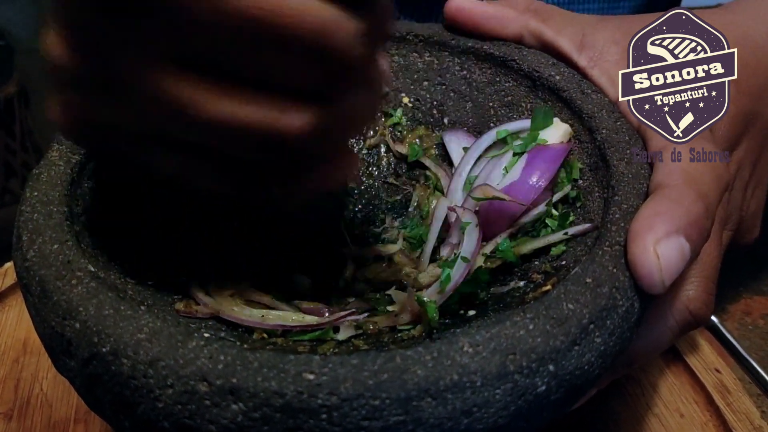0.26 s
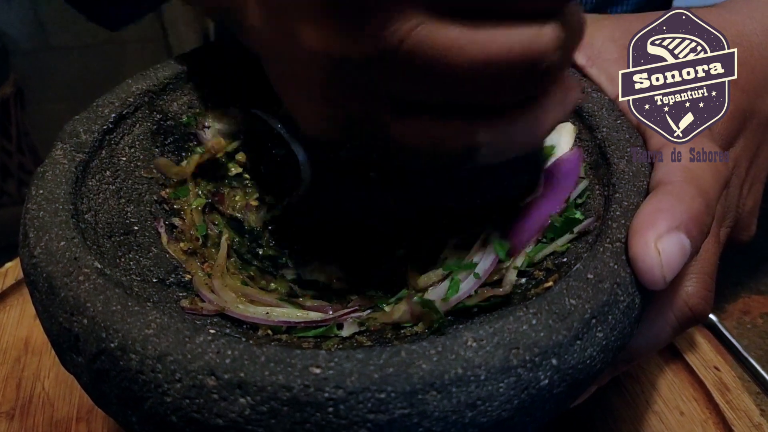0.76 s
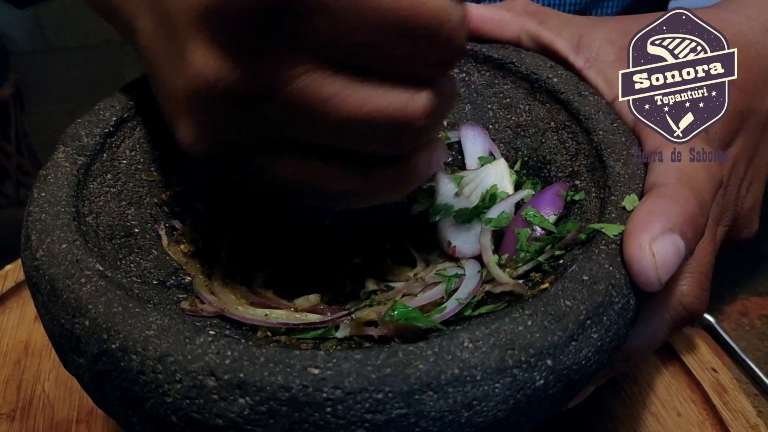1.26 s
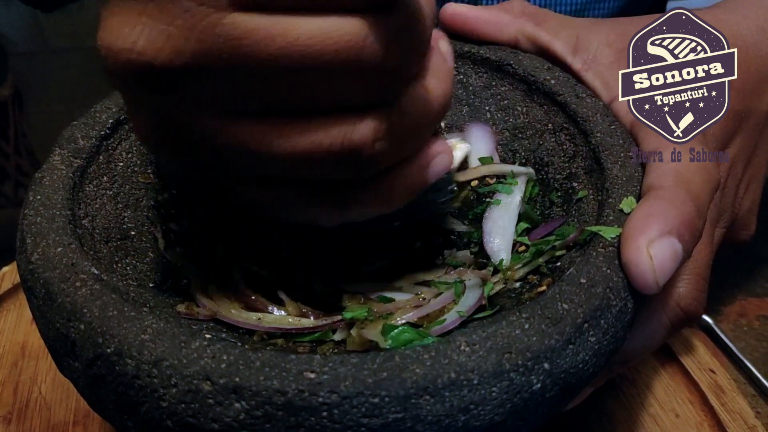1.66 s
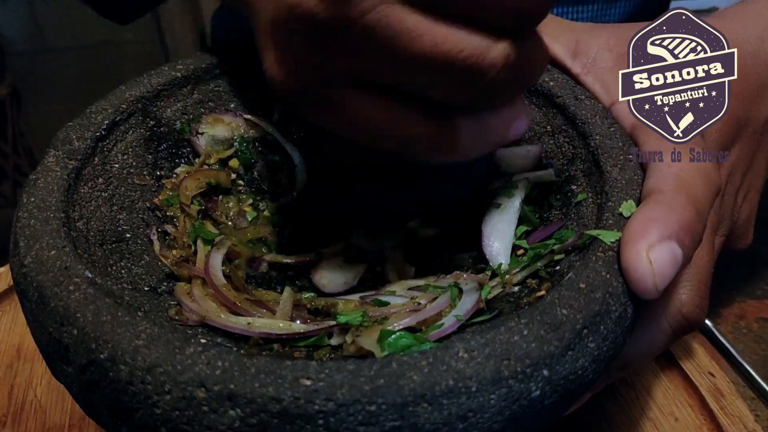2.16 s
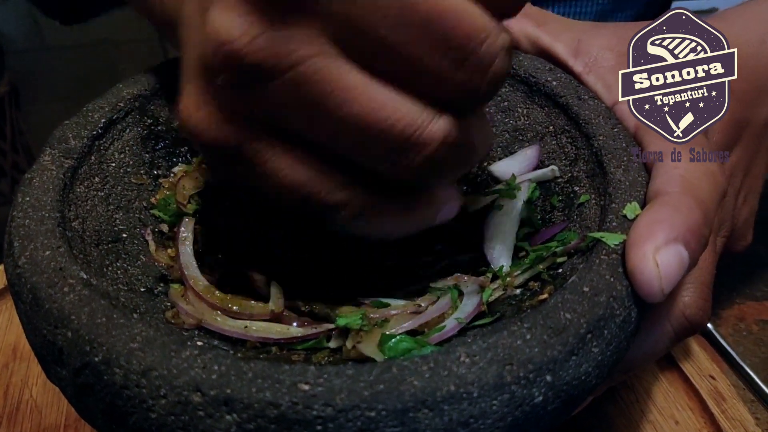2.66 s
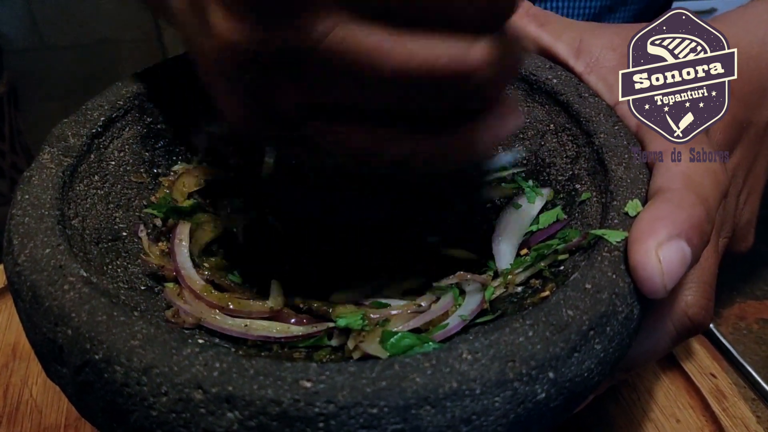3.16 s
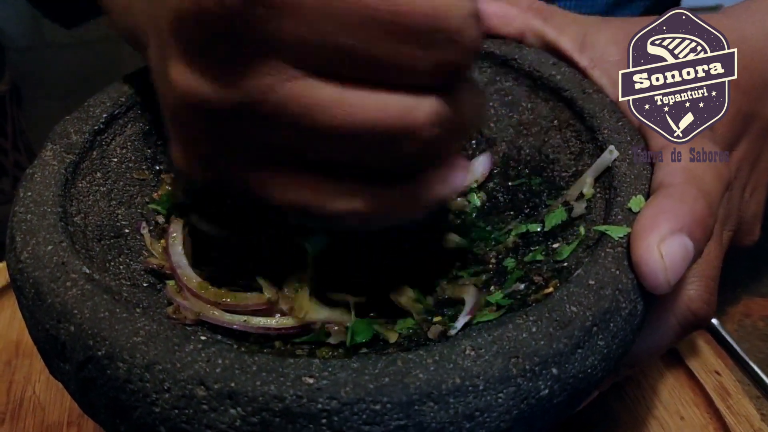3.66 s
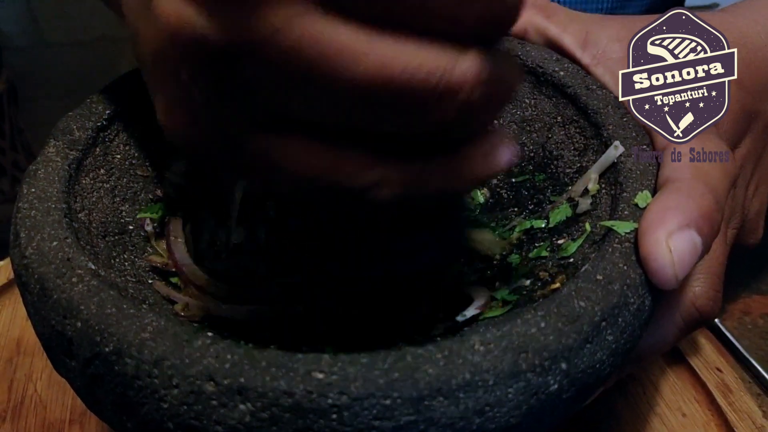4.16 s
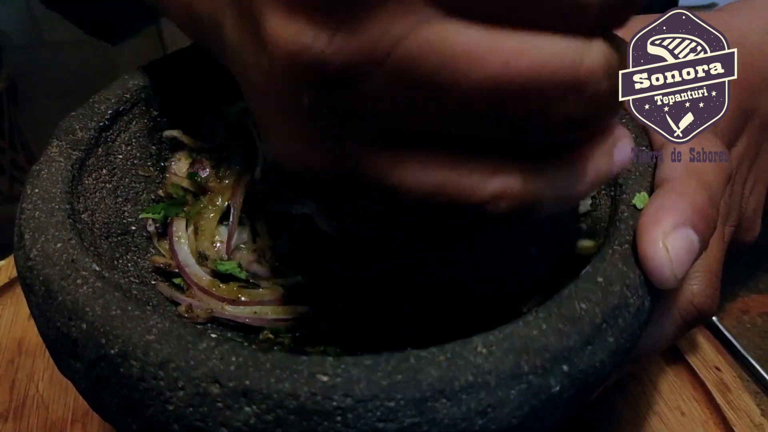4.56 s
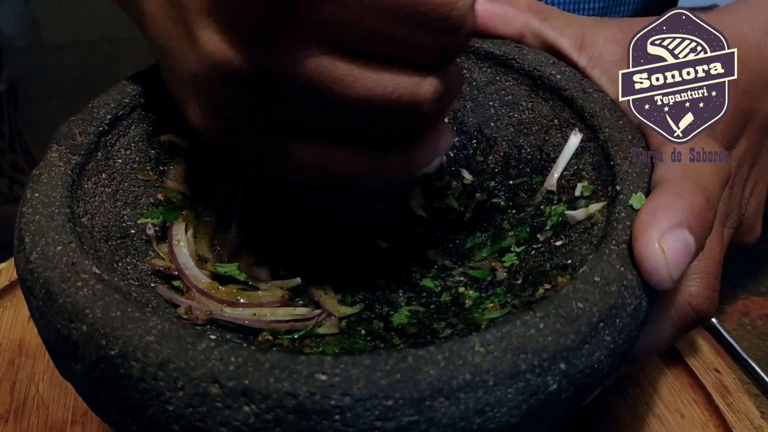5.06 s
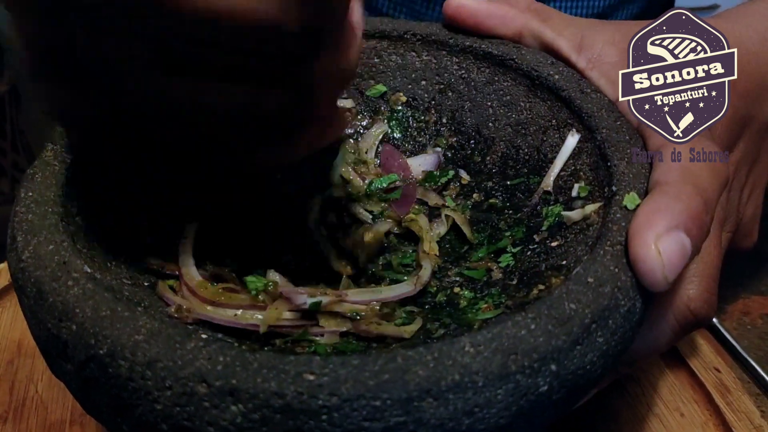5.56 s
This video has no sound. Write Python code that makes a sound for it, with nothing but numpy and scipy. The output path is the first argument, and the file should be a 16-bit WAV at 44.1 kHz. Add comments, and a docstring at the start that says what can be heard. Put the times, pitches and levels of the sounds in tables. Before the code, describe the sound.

Moist leaves and onion crunch under quick pestle strokes, stone scraping and knocking on stone, close up in a quiet kitchen.

```python
"""A stone pestle grinds onion, herbs and chilies in a stone mortar on a wooden board, about three strokes
a second. Over the hush of a quiet kitchen, wet leaves crackle from the first press. Stone then scrapes
and knocks on stone, exciting the modes of mortar and board, and single fibres snap. After about three
seconds the paste thins: the pestle rings on bare stone, and the hardest knocks follow. Throughout, the
room reverberates and two close microphone ports hear it all."""
import sys
import numpy as np
from scipy import signal
from scipy.fft import rfft, irfft, next_fast_len
from scipy.io import wavfile
from scipy.ndimage import uniform_filter1d, map_coordinates

SR = 44100
rng = np.random.default_rng(int(sys.argv[2]) if len(sys.argv) > 2 else 0)


def unload_audio(sound):
    """Save the sound as a 16-bit wav file, at the path given as the first command line argument."""
    columns = np.transpose(np.atleast_2d(sound))
    # keep every value between -1 and 1, then stretch to whole-number steps
    steps = np.round(np.clip(columns, -1, 1) * 32767)
    wavfile.write(sys.argv[1], SR, steps.astype(np.int16))


N = 255956
GRID_S = np.arange(0, N / SR + .002, .001)  # envelope times, a millisecond apart

# Spectrum of the kitchen's hush: frequency_hz, density_db
HUSH_SPECTRUM = [(18, -49), (30, -20.5), (215, -16), (374, -23.5), (937, -28.5), (1500, -36), (6550, -31.5),
                 (12000, -43.5), (16000, -61.5)]
# Presses that crush the food: contact_s, contact_db, swell_s, peak_db, drag_s, lift_db, crispness_db
PRESSES = [(.014, -49, 0.018, -46.5, 0.028, -46, -7.5), (.066, -34.5, 0.028, -29, 0.086, -43.5, -7),
           (.155, -49, .01, -43, 0.24, -50.5, -2), (0.383, -44, .02, -35.5, 0.21, -43.5, -0.5),
           (0.654, -52.5, 0.0046, -44, 0.0025, -45.5, -10), (0.761, -51, .002, -50, 0.0092, -49.5, 7),
           (0.771, -38.5, 0.0027, -39.5, 0.035, -46, -2), (0.823, -42, 0.024, -22.5, 0.12, -51, -6.5),
           (.99, -55, 0.0089, -52, 0.021, -56, -30), (1.094, -48.5, .06, -29, 0.07, -44.5, -5.5),
           (1.25, -55, 0.063, -37.5, .005, -35.5, -8.5), (1.438, -36, 0.079, -35, 0.16, -43.5, -3),
           (1.773, -47.5, .01, -46, 0.16, -57.5, 1.5), (1.925, -37, .013, -23.5, 0.015, -39.5, -12.5),
           (1.96, -42, .048, -36, 0.0045, -37.5, -10), (2.188, -42, 0.077, -32.5, 0.056, -49.5, -4),
           (2.336, -44, 0.044, -42, 0.17, -65, -10), (2.554, -38.5, 0.087, -34, 0.054, -52, -1.5),
           (2.695, -50.5, .027, -36.5, 0.13, -60, -10), (2.946, -44, 0.012, -39, 0.035, -45.5, -0.5),
           (3.005, -31.5, 0.009, -22.5, 0.03, -35.5, -7.5), (3.058, -38, .006, -38, 0.13, -57.5, -6),
           (3.283, -35, 0.0022, -35, 0.016, -48.5, 2.5), (3.327, -40.5, 0.016, -26, 0.11, -47, -4),
           (3.462, -36, .006, -35, 0.056, -51, -25), (3.632, -44.5, 0.077, -32.5, .125, -57.5, -5),
           (3.835, -42, 0.011, -42.5, .003, -45.5, -13), (3.95, -49, 0.04, -32, 0.089, -41, -2),
           (4.05, -44.5, 0.063, -39, 0.064, -48.5, -16), (4.282, -60, 0.0059, -39, .2, -53.5, 2.5),
           (4.607, -54.5, 0.083, -36, 0.048, -52.5, 0), (4.735, -46, 0.059, -50, 0.0041, -49, -2.5),
           (4.925, -49.5, 0.083, -37.5, 0.16, -55.5, -1), (5.277, -46.5, 0.047, -29.5, 0.011, -43, -1),
           (5.334, -45.5, 0.056, -38.5, 0.14, -55, -4.5), (5.63, -50, 0.032, -42, 0.12, -39, -3.5)]
# Spectrum of the wet crackle: frequency_hz, density_db
WET_SPECTRUM = [(880, -49.5), (1500, -24.5), (3050, -15), (3820, -3), (4470, 1), (5280, 4), (5890, 1.5),
                (7010, 2), (9230, -12), (11000, -21.5), (14300, -49), (22000, -120)]
# Spectrum of its crisp top: frequency_hz, density_db
CRISP_SPECTRUM = [(4710, -24), (8000, 3.5), (9340, 2.5), (12200, 4), (15200, -3), (16100, -24),
                  (16400, -31), (16500, -33)]
# Stone rubbing stone, the last three columns relative to bowl_db:
# peak_s, bowl_db, rise_s, hold_s, fade_db_per_s, belly_db, rim_db, board_db
SCRAPES = [(0.018, -54.5, 0.01, .002, 307, 4, -9, 5.5), (0.074, -41, 0.099, 0.0018, 550, 1, 4, -94),
           (0.13, -54.5, 0.055, .002, 146.5, 4.5, 8, 2), (0.447, -36, 0.0077, 0.041, 1200, -8.5, -4, -13.5),
           (0.503, -51, .03, 0.026, 400, -4.5, 2, -6.5), (0.577, -40, 0.014, .022, 897, -2, -3, -12),
           (0.769, -85.5, 0.024, 0.012, 297, -1, 14, 29.5), (0.87, -73, .03, 0.031, 175, 8, 10.5, 0),
           (1.182, -68.5, 0.034, 0.033, 303, 9.5, 16.5, 0.5),
           (1.272, -53.5, 0.053, 0.012, 257, -8, -6, -11.5),
           (1.557, -35, 0.021, .002, 445.5, -11, -5.5, -24),
           (1.761, -75.5, .04, 0.078, 297, 15, -1.5, 18.5), (1.887, -39.5, 0.037, .002, 900, -12.5, 5, -16),
           (1.932, -25, 0.0066, 0.013, 306, -11.5, -10, -35.5), (2.225, -70.5, 0.037, .005, 315, -1, 0, 10),
           (2.244, -30.5, 0.012, .002, 324.5, -25, -9.5, -18),
           (2.575, -32, 0.024, 0.0014, 397, -1, -16.5, -3),
           (2.945, -80.5, 0.017, 0.01, 97.5, 26.5, 10.5, 29.5),
           (3.072, -39, 0.094, 0.0016, 339, -11.5, -3.5, -25.5),
           (3.292, -25, 0.0068, 0.0069, 188.5, -1.5, -2, -9.5),
           (3.638, -35.5, 0.016, .002, 547.5, -13.5, -9.5, -8),
           (3.693, -30, .06, 0.0013, 435, -5.5, -6.5, -3.5), (3.96, -46, 0.016, 0.026, 598, 1, -4.5, 0.5),
           (4.005, -28, 0.0078, .004, 646.5, -6.5, -4.5, -3),
           (4.283, -32.5, 0.0057, 0.011, 595, 0, -15.5, -8),
           (4.323, -22.5, 0.046, 0.0023, 1200, -3, -8, -25.5),
           (4.353, -21, 0.0063, 0.0048, 907, -5.5, -9, 1), (4.369, -38.5, 0.024, 0.061, 500, -7, -12, 1.5),
           (4.609, -39.5, 0.01, 0.03, 501, 9, -8.5, -3.5), (4.649, -22, 0.036, .004, 798, 1.5, -12, -12.5),
           (4.681, -29.5, .025, 0.0086, 500, -1.5, -8, -3),
           (4.725, -42.5, 0.021, 0.038, 494, -17, -7.5, -12),
           (4.925, -42.5, 0.012, .04, 498.5, 0.5, -0.5, -8.5),
           (4.983, -20.5, 0.037, 0.0047, 692, -5.5, -5.5, -29),
           (5.01, -31.5, 0.041, 0.011, 205, -6.5, -16, -26),
           (5.284, -31.5, 0.021, 0.088, 288, -4, -8.5, -13.5),
           (5.49, -63.5, .006, 0.0057, 400, -5, -8, 21.5), (5.64, -28.5, 0.02, 0.1, 201.5, -9, 1, -12)]
# Middle modes of the mortar: pitch_hz, bandwidth_hz, level_db
BOWL_MODES = [(687, 67.5, 2.5), (794, 74, 1.5), (920, 70, 3.5), (1039.6, 76, 3.5), (1203, 64, -1),
              (1350, 59, -3)]
# Low modes of the mortar: pitch_hz, bandwidth_hz, level_db
BELLY_MODES = [(393, 90, 0), (453.4, 104, -1.5), (542.7, 66, -2.5)]
# Upper modes of the mortar: pitch_hz, bandwidth_hz, level_db
RIM_MODES = [(1550, 400, 3), (1909, 130, 5.5), (2180, 160, 0), (2755, 290, -11.5)]
# Modes of the wooden board: pitch_hz, bandwidth_hz, level_db
BOARD_MODES = [(130, 63, -5.5), (173, 28, -0.5), (186.8, 9.1, -7), (264.4, 74, -8)]
# Coupling of the crushing to each body: bowl_db, belly_db, rim_db, board_db
PRESS_COUPLING = [-50.5, -36, -28, -40.5]
# Impacts of the pestle: start_s, level_db, spot_pitch_hz, board_db, rebound_ratio
IMPACTS = [(0.061, -22.5, 660, -61, 1), (0.081, -39.5, 695, -34.5, 0.7), (0.156, -30, 1500, -55, 0),
           (0.45, -17, 706, -49.5, 0.07), (0.474, -22.5, 1250, -60.5, 0.2), (0.493, -34, 1005, -62, 0.4),
           (0.577, -29.5, 1290, -57, 0.8), (0.791, -58, 347, -50.5, 0.3), (1.187, -40.5, 1970, -84, 1),
           (1.205, -50, 1400, -85, 0.5), (1.231, -36, 1520, -84, 0.2), (1.285, -35.5, 1430, -60, 0.32),
           (1.56, -16.5, 700, -64, 0), (1.77, -49, 423, -46, 0.7), (1.885, -23.5, 1210, -68, 0.2),
           (1.933, -13, 980, -61, 0.96), (1.939, -11, 697, -54, 0.6), (1.952, -28.5, 890, -59, 0.3),
           (1.984, -22, 649, -48, 0.5), (2.217, -31.5, 455, -35, 0.4), (2.249, -16, 1115, -57, 0.3),
           (2.282, -27, 1080, -68, 1), (2.576, -15, 756, -24, 0), (2.951, -40, 396, -39.5, 0.3),
           (3.059, -32, 1056, -57.5, 0), (3.294, -13, 557, -31.5, 0), (3.329, -16.5, 990, -26, 0.4),
           (3.635, -28.5, 673, -45, 1), (3.666, -17.5, 646, -60, 0.68), (3.688, -11.5, 710, -22, 0),
           (4.008, -10, 470, -21, 0), (4.289, -21, 450, -36.5, 0.74), (4.314, -11.5, 399, -36, 0.1),
           (4.356, -5.5, 375, -18.5, 0.52), (4.635, -13, 670, -30.5, 0), (4.65, -7, 593, -22.5, 0),
           (4.677, -11.5, 360, -21.5, 0.92), (4.733, -23, 762, -54, 0.43), (4.962, -21, 681, -40.5, 0.6),
           (4.978, -11.5, 489, -34.5, 0.84), (4.986, -2.5, 663, -39, 0.26), (5.016, -12.5, 677, -50, 0.5),
           (5.065, -27.5, 1010, -65.5, 0.8), (5.312, -2, 1027, -27, 0.27), (5.374, -48, 925, -56, 0.25),
           (5.418, -28.5, 926, -67, 0.46), (5.498, -28.5, 412, -27.5, 0.65)]
# Fibres that snap: start_s, level_db, t60_s, left_over_right_db, brightness_db
FIBRE_SNAPS = [(0.0702, -17, 0.02, 7, -22), (0.0904, -14, 0.018, 9, -13), (0.2194, -24, 0.02, 1, -16),
               (0.239, -17.5, 0.026, 10, -23), (0.286, -19, 0.034, 2.5, -22),
               (0.406, -23.5, 0.028, 20, -16.5), (0.4432, -12, 0.037, 5, -16.5),
               (0.4664, -22.5, 0.018, -7, -16.5), (0.509, -20, 0.06, 3, -12), (0.58, -19.5, 0.027, 10, -23),
               (0.653, -23.5, 0.013, 30, -32), (0.7768, -9.5, 0.016, -8, -15),
               (0.848, -3.5, 0.019, 3, -23.5), (0.895, -29, 0.02, 4.0, -17.5),
               (1.009, -32, 0.016, 16, -44.5), (1.0979, -20, 0.06, 6.5, -21), (1.1408, -18, 0.033, 4, -11),
               (1.27, -30, 0.06, 13.5, -22), (1.3058, -14.5, 0.018, 7.5, -25),
               (1.3245, -17, 0.012, 15, -18), (1.4975, -13, 0.06, 4.5, -17.5),
               (1.559, -17.5, 0.029, 3, -11.5), (1.8806, -18.5, 0.039, -1.5, -18),
               (1.934, -28.5, 0.02, 3.0, -18.5), (2.0123, -22, 0.023, 11.5, -18.5),
               (2.248, -16.5, 0.022, 2.0, -6), (2.2799, -21, 0.034, 3.5, 0.5),
               (2.347, -25.5, 0.017, 5, -11), (2.371, -20.5, 0.06, 6, -8.5),
               (2.4593, -32, 0.018, 10.0, -37), (2.558, -23, 0.016, -9, -22), (2.7, -27.5, 0.04, 0.5, -4),
               (2.7264, -11.5, 0.033, 8.5, -22.5), (2.782, -25, 0.02, 11, -27),
               (2.809, -26.5, 0.017, 9, -28), (2.9292, -39.5, 0.012, 3, -2),
               (2.9925, -21, 0.015, -7, -17.5), (3.009, -11, 0.017, -8, -26), (3.0644, -25, 0.028, 3.5, -6),
               (3.1462, -28, 0.012, 14, -30.5), (3.1763, -36, 0.021, 15, -37),
               (3.3317, -9.5, 0.019, 6, -21), (3.4635, -26.5, 0.019, 15, -31), (3.506, -25, 0.034, 5, -22),
               (3.688, -20, 0.026, 6, -14.5), (3.7294, -17, 0.02, 11.5, -24),
               (3.767, -25.5, 0.013, 22, -15.5), (3.818, -30.5, 0.023, 10, -6.5),
               (3.8524, -29, 0.016, 7, -29), (3.9629, -27, 0.02, 3, -12), (4.1583, -20, 0.017, 12.5, -41),
               (4.345, -16, 0.018, -1, -10), (4.362, -3.5, 0.0088, -8, -12), (4.419, -27, 0.02, 6.5, -19),
               (4.448, -22.5, 0.036, 6, -14), (4.4979, -23, 0.042, 0.5, -25),
               (4.6365, -21.5, 0.044, -2, -7), (4.681, -12.5, 0.034, 0.5, -21.5),
               (4.7723, -19.5, 0.021, 10, -18), (4.9767, -13.5, 0.023, 1, -12),
               (4.9852, -6, 0.017, 3.5, -16.5), (5.0084, -20, 0.028, -2, -14),
               (5.1256, -26, 0.026, 9.5, -20), (5.1472, -36, 0.045, 22.5, -30),
               (5.3094, -19.5, 0.028, 17, -16.5), (5.5083, -32, 0.022, 5, -3.5)]
# Slides on bare stone: peak_s, level_db, hold_s
BARE_SLIDES = [(3.29, -45.5, .02), (3.636, -54.5, .03), (3.96, -60, .03), (4.288, -39, 0.023),
               (4.613, -47.5, .055), (4.933, -42.5, .07), (5.28, -36, .06), (5.636, -30.5, 0.096)]
# Modes of the pestle on bare stone: pitch_hz, bandwidth_hz, level_db
PESTLE_MODES = [(3262, 91, 8.5), (3960, 200, -6)]
# Reverberation time of the kitchen: frequency_hz, t60_s
ROOM_DECAY = [(150, 0.083), (1000, 0.4), (5000, 0.22), (14000, 0.36)]
# Likeness of the sound at the two ports: frequency_hz, coherence_ratio
PORT_COHERENCE = [(30, 1), (150, 0.97), (600, 0.96), (1500, 0.49), (4000, 0.13)]


def amp(db):
    """Decibels as an amplitude ratio."""
    return 10 ** (np.asarray(db) / 20)


def unit(x):
    """Normalisation to an rms of one."""
    return x / np.sqrt(np.mean(x ** 2) + 1e-20)


def along(points, hz):
    """Interpolation on a logarithmic frequency axis."""
    knots_hz, values = np.transpose(points)
    return np.interp(np.log(hz + 1), np.log(knots_hz + 1), values)


def per_sample(envelope):
    """Linear interpolation from the millisecond grid to samples."""
    return np.interp(np.arange(N) / SR, GRID_S, envelope)


def wobble(knots_per_s):
    """Smooth random modulation: a spline through Gaussian knots."""
    knots = rng.standard_normal(int(N * knots_per_s / SR) + 4)
    return per_sample(map_coordinates(knots, [GRID_S * knots_per_s]))


def filtered(x, response):
    """Linear filtering: the spectrum times a frequency response."""
    size = next_fast_len(N + SR // 2)
    return irfft(rfft(x, size) * response(np.fft.rfftfreq(size, 1 / SR)), size)[..., :N]


def highpass(hz, edge_hz):
    """Response of a causal second-order high-pass."""
    return (1j * hz / (edge_hz + 1j * hz)) ** 2


def colour(spectrum):
    """Spectral shaping that conserves the power of white noise."""
    rms = np.sqrt(np.mean(amp(along(spectrum, np.arange(SR // 2))) ** 2))
    return lambda hz: amp(along(spectrum, hz)) / rms


def ports(shared, differing, lag_s=4 / SR):
    """Partial coherence: two ports differ most in the treble, and the left hears later."""
    angle = lambda hz: np.arccos(along(PORT_COHERENCE, hz)) / 2
    mid = filtered(shared, lambda hz: np.cos(angle(hz)))
    side = filtered(differing, lambda hz: np.sin(angle(hz)))
    delay = lambda hz: np.exp(-1j * np.pi * hz * lag_s * np.array([[1], [-1]]))
    return filtered(np.array([mid + side, mid - side]), delay)


def hush():
    """Stationary noise: the faint background of the kitchen."""
    return amp(-69.5) * filtered(ports(*rng.standard_normal((2, N))), colour(HUSH_SPECTRUM))


def crushing(touch_s=.017, touch_rise_db=43.5, lift_db_per_s=611, dulling_db_per_s=52.5):
    """Incoherent presses add in power: envelopes of the crackle and its top, which dulls in the drag."""
    power, crisp_power = np.zeros((2, len(GRID_S)))
    for contact_s, contact_db, swell_s, peak_db, drag_s, lift_db, crispness_db in PRESSES:
        peak_s = contact_s + swell_s
        lift_s = peak_s + drag_s
        times = [contact_s - touch_s, contact_s, peak_s, lift_s, lift_s + 1]
        levels = [contact_db - touch_rise_db, contact_db, peak_db, lift_db, lift_db - lift_db_per_s]
        db = np.interp(GRID_S, times, levels, left=-200)
        dulling_db = dulling_db_per_s * np.clip(GRID_S - peak_s, 0, 1)
        power += amp(2 * db)
        crisp_power += amp(2 * (db + crispness_db - dulling_db))
    return np.sqrt(power), np.sqrt(crisp_power)


def grit(breaks_per_s, spread_db, clump_db=2):
    """Shot noise: tiny random fractures over smooth rubbing noise, modulated into clumps."""
    occurs = rng.random(N) < breaks_per_s / SR
    sizes = amp(spread_db * rng.standard_normal(N))
    breaks = unit(occurs * sizes * np.sign(rng.standard_normal(N)))
    rubbing = .8 * rng.standard_normal(N)
    clumps = amp(clump_db * (wobble(45) + .83 * wobble(160)))
    return unit((breaks + rubbing) * clumps)


def squelch(count=3000, median_hz=6000, spread_db=1):
    """Damped oscillation: each juice pocket bursts at its own pitch."""
    starts = (rng.random((count, 1)) * N).astype(int)
    pitch_hz = median_hz * np.exp(.3 * rng.standard_normal((count, 1)))
    sizes = amp(spread_db * rng.standard_normal((count, 1)))
    age = np.arange(128)
    cycles = pitch_hz * age / SR
    pops = sizes * np.sin(2 * np.pi * cycles) * np.exp(-cycles / 3.5)
    return unit(np.bincount((starts + age).ravel(), pops.ravel(), N + 128)[:N])


def ticks(per_s=45, level_db=7, t60_s=.0035):
    """A Poisson process: stray fibres break, each briefly raising the gain of the crackle."""
    starts = (rng.random(N) < per_s / SR) * amp(level_db + rng.standard_normal(N))
    decay = amp(-60 * np.arange(SR // 50) / SR / t60_s)
    return 1 + np.abs(signal.fftconvolve(starts, decay)[:N])


def shreds(x, depth_db=3):
    """Spectral modulation: each shred of leaf colours its own patch of frequency and time."""
    spectra = signal.stft(x, nperseg=256)[2]
    patches = uniform_filter1d(rng.standard_normal(spectra.shape[-2:]), size=5, axis=0)
    patches = uniform_filter1d(patches, size=6, axis=1)
    return unit(signal.istft(spectra * amp(depth_db * unit(patches)), nperseg=256)[1][..., :N])


def crackle():
    """Fracture noise: leaves and onion tear and fibres snap, in a wet band and a crisp one above it."""
    wet_gain, crisp_gain = map(per_sample, crushing())
    grains = [grit(breaks_per_s=2500, spread_db=4.5) + .24 * squelch() for _ in range(2)]
    tearing = ticks() * ports(*shreds(np.array(grains)))
    wet_snaps, crisp_snaps = snaps()
    wet = filtered(wet_gain * tearing + amp(-6) * wet_snaps, colour(WET_SPECTRUM))
    crisp = filtered(crisp_gain * tearing + amp(-1) * crisp_snaps, colour(CRISP_SPECTRUM))
    return wet * amp([[1], [-1]]) + crisp * amp([[3], [-3]])  # both louder on the left


def contact_power(peak_s, rise_s, hold_s, fade_db_per_s, rise_db=37):
    """Exponential growth, hold and exponential decay of the power of one contact."""
    before = np.clip(peak_s - GRID_S, 0, None)
    after = np.clip(GRID_S - peak_s - hold_s, 0, None)
    return amp(-2 * (rise_db * before / rise_s + fade_db_per_s * after))


def friction():
    """Friction drives bowl, belly, rim and board: envelopes of crushing, scrapes and lingering slides."""
    slide_db, slide_db_per_s = np.c_[[-19, -12, -10.5, -13.5]], np.c_[[170, 170, 150, 150]]
    power = amp(2 * np.c_[PRESS_COUPLING]) * crushing()[0] ** 2
    for peak_s, bowl_db, rise_s, hold_s, fade_db_per_s, *others_db in SCRAPES:
        rub = contact_power(peak_s, rise_s, hold_s, fade_db_per_s)
        slide = amp(2 * slide_db) * contact_power(peak_s, rise_s, hold_s, slide_db_per_s)
        power += amp(2 * (bowl_db + np.c_[[0, *others_db]])) * (rub + slide)
    return np.sqrt(power)


def resonator(modes):
    """Modal superposition at unit noise gain; little radiates below the lowest mode."""
    def response(hz):
        peaks = sum((-1) ** k * amp(db) * 1j * hz * width / (pitch ** 2 - hz ** 2 + 1j * hz * width)
                    for k, (pitch, width, db) in enumerate(modes))
        return highpass(hz, .81 * modes[0][0]) * peaks
    rms = np.sqrt(np.mean(np.abs(response(np.arange(SR // 2))) ** 2))
    return lambda hz: response(hz) / rms


def scrape():
    """Forced vibration: grit between the stones drives the modes of mortar, board and pestle."""
    drives = map(per_sample, [*friction(), bare_stone()])
    bodies = BOWL_MODES, BELLY_MODES, RIM_MODES, BOARD_MODES, PESTLE_MODES
    return sum(filtered(drive * grit(breaks_per_s=600, spread_db=2), resonator(modes))
               for drive, modes in zip(drives, bodies))


def struck(modes, t, damping, rise_s, weight_db=lambda hz: 0):
    """Free vibration after a soft-edged blow: decaying modes of random strength, summed to peak 1."""
    hz, width_hz, db = np.transpose(modes)[..., None]
    strengths = amp(db + weight_db(hz) + rng.normal(0, 1.4, hz.shape))
    partials = strengths * np.exp(-np.pi * width_hz * damping * t) * np.sin(2 * np.pi * hz * t)
    ring = partials.sum(0) * (1 - np.exp(-(t / rise_s) ** 2))
    return ring / np.abs(ring).max()


def knocks(crack_t60_s=.005):
    """Impact excitation: the mortar cracks and rings, damped by paste and hand, and the board thuds."""
    pair = np.zeros((2, N + SR))  # what the ports share, and what they differ by
    t = np.arange(SR // 4) / SR
    brief = t[:SR // 14]
    mortar = BELLY_MODES + BOWL_MODES + RIM_MODES
    for start_s, db, spot_hz, board_db, rebound in IMPACTS:
        near_spot = lambda hz: -28 * np.log2(hz / spot_hz) ** 2
        delays_s = np.cumsum([0, *rng.uniform(.00347, .00654, 2)])  # the blow and two rebounds
        for bounce, delay_s in enumerate(delays_s):
            at = round((start_s + delay_s) * SR)
            for part, sign in zip(pair, (1, rng.choice([-1, 1]))):
                ring = struck(mortar, brief, damping=2.23, rise_s=.0018, weight_db=near_spot)
                part[at:at + len(brief)] += sign * amp(db) * rebound ** bounce * ring
        at = round(start_s * SR)
        crack = uniform_filter1d(rng.standard_normal((2, len(brief))), size=7)
        pair[:, at:at + len(brief)] += amp(db - 8 - 60 * brief / crack_t60_s) * crack
        thud = struck(BOARD_MODES, t, damping=.85, rise_s=.0011)
        pair[0, at:at + len(t)] += amp(board_db + 5) * thud
    return filtered(pair[:, :N], lambda hz: highpass(hz, 50) ** 2)


def snaps(rise_s=.0005, edge_hz=4500):
    """Brittle fracture: each fibre gives a decaying burst of treble noise to the wet and crisp bands."""
    envelopes = np.zeros((2, 2, N + SR))  # band, port, sample
    t = np.arange(SR // 8) / SR
    for start_s, db, t60_s, pan_db, brightness_db in FIBRE_SNAPS:
        burst = amp(db - 60 * t / t60_s) * (1 - np.exp(-t / rise_s))
        pan = amp([[pan_db / 2], [-pan_db / 2]])
        bands = amp([[[0]], [[brightness_db]]])
        at = round(start_s * SR)
        envelopes[..., at:at + len(t)] += burst * pan * bands
    noise = ports(*rng.standard_normal((2, N)))
    return filtered(envelopes[..., :N] * noise, lambda hz: highpass(hz, edge_hz))


def bare_stone():
    """Friction on bare stone: the envelope that drives the pestle's ring once the paste thins."""
    return np.sqrt(sum(amp(2 * db) * contact_power(peak_s, .012, hold_s, fade_db_per_s=296.5)
                       for peak_s, db, hold_s in BARE_SLIDES))


def reverberation(x):
    """A diffuse field: each frequency of the room's answer decays at its own rate."""
    hz, t, spectra = signal.stft(rng.standard_normal((2, SR // 2)), SR, nperseg=256)
    decay = amp(-60 * t / along(ROOM_DECAY, hz)[:, None])
    tail = signal.istft(spectra * decay, SR, nperseg=256)[1]
    delayed = np.pad(x, ((0, 0), (200, 0)))
    return signal.fftconvolve(delayed, tail / np.linalg.norm(tail[0]), axes=1)[:, :N]


def scene():
    """Superposition of food, stone, reverberation and hush at the two ports."""
    food = crackle()
    scraping = np.array([scrape(), scrape()])
    stone = ports(*(scraping + knocks()))
    return food + stone + reverberation(amp(-24) * food + amp(-20.5) * stone) + hush()


def record(dry, bottom_hz=6, ceiling=.8, top_hz=16600):
    """Band limiting, and a soft limit that rounds off the loudest knocks to keep them below full scale."""
    x = filtered(dry, lambda hz: highpass(hz, bottom_hz))
    rounded = x / (1 + np.abs(x / ceiling) ** 4) ** (1 / 4)
    return filtered(rounded, lambda hz: hz < top_hz)


dry = scene()
out = record(dry)
unload_audio(out)
```